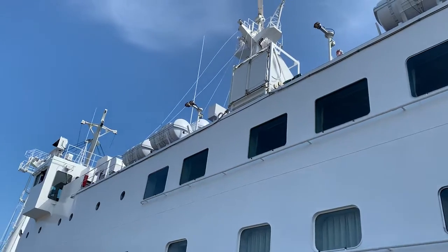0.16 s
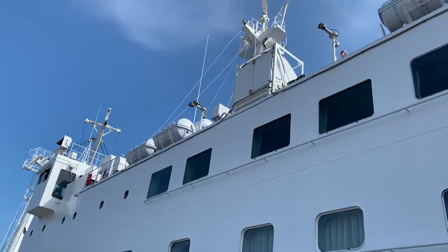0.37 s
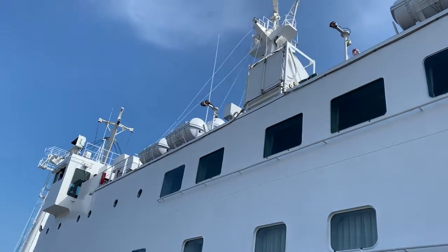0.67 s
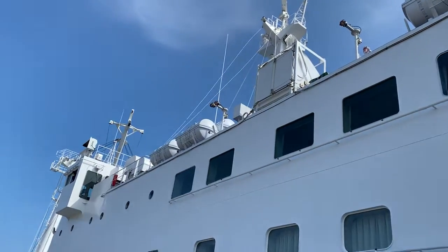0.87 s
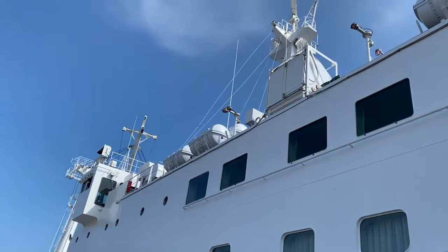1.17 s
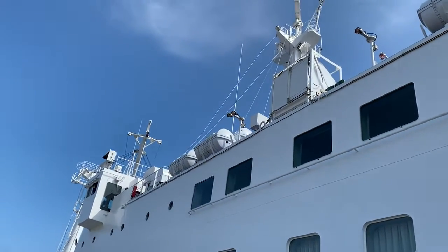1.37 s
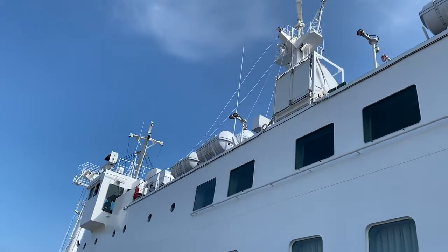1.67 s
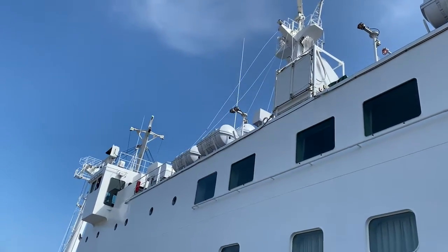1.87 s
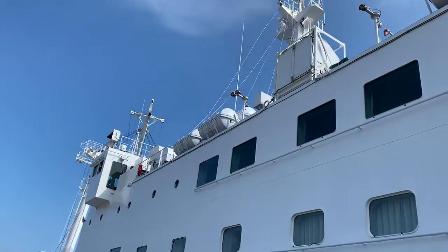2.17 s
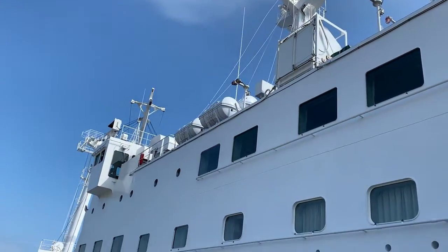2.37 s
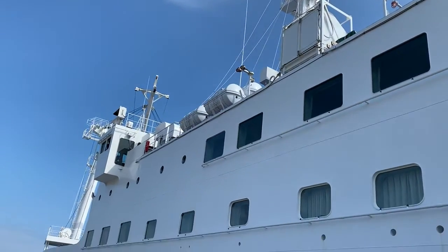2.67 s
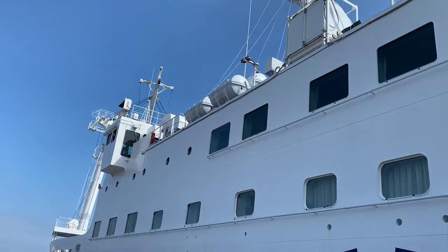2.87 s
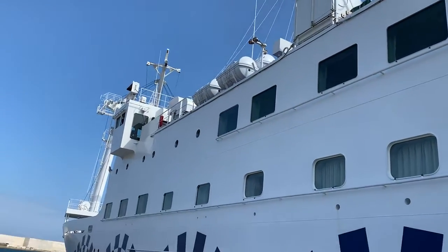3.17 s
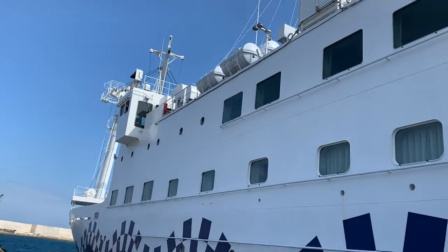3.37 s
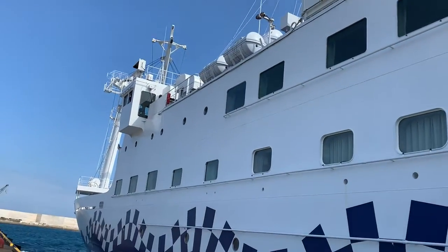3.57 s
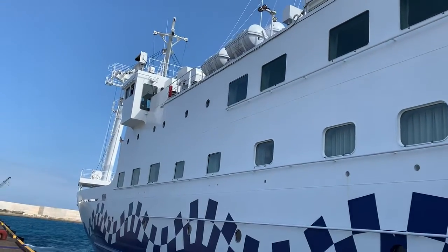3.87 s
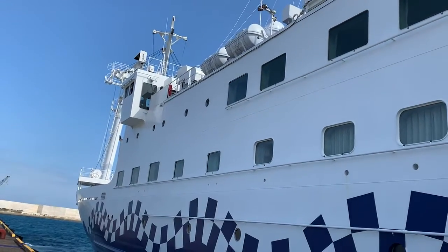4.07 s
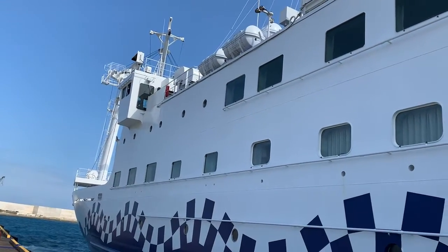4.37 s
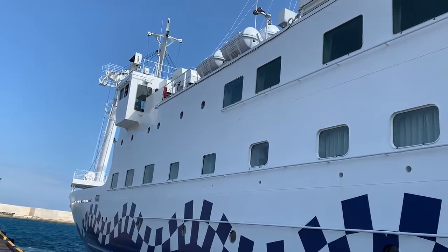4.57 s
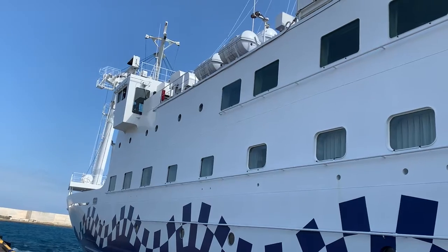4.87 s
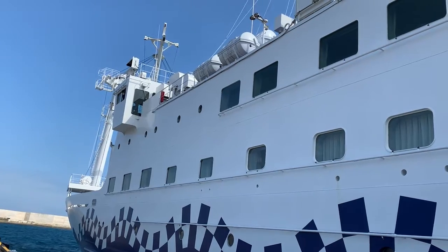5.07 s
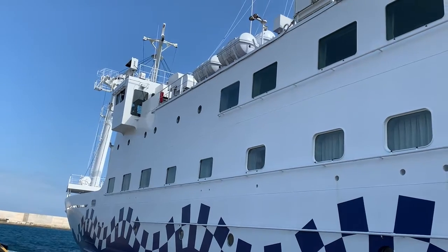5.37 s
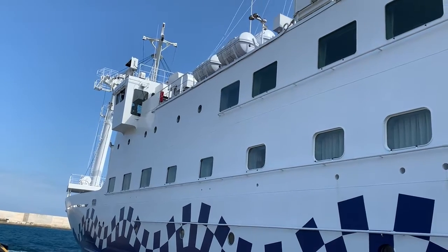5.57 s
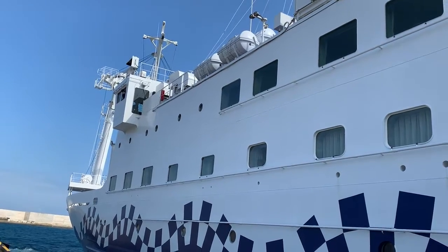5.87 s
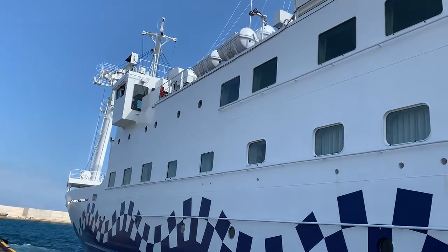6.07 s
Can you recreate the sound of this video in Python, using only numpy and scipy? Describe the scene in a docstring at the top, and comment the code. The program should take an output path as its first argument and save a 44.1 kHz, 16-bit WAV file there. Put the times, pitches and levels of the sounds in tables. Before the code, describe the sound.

From 0 s a large ferry's horn is already sounding, loud and close: one steady low note, near 180 Hz, with a strong octave and a buzzing, brassy stack of overtones that shimmer and waver. Air hisses through it, and low gusts of wind buffet the microphone underneath. The pitch never changes. At about 2.2 s the valve shuts with a tiny puff; the tone collapses within a quarter second, the lowest note lingering last, and a much weaker harbour echo fades until roughly 4.5 s. Small wind pops come at 2.4-2.9 s. From 3 to 4 s it is quiet: low rumble, faint water wash, barely audible soft rustles near 3.7 s. Wind pops return at 4.1-4.5 s, then sharp crackling, thumping bursts cluster around 4.9-5.3 s and 5.45-5.8 s, mostly left. It ends at about 6 s in rumbling wind.

```python
"""A ferry's horn at a pier holds one steady blast, which stops and echoes round the harbour.
The horn is a stack of partials; each reaches the two microphone ports by drifting paths and fades on its own.
Air hisses through the horn: noise that puffs once a cycle. Gusty wind is shaped noise that rumbles and
crackles on the ports, with pops of diving tone and crackle. Harbour wash and soft rustles are faint noise.
"""
import sys
import numpy as np
from scipy import signal
from scipy.fft import rfft, irfft, next_fast_len
from scipy.io import wavfile
from scipy.ndimage import uniform_filter1d

SR = 44100
rng = np.random.default_rng(int(sys.argv[2]) if len(sys.argv) > 2 else 0)


def store_pcm(level_fs):
    """Save levels as 16-bit WAV."""
    pcm = np.round(np.clip(level_fs, -1, 1) * 32767).astype(np.int16)
    wavfile.write(sys.argv[1], SR, np.atleast_2d(pcm).T)


N = 273640  # samples

HORN_HZ, EDGE_HZ = 179.42, 15700  # horn's fundamental, upper band limit
SHUT_S = 2.22  # the valve shuts; the near echo off the hull and quay runs on briefly
NEAR_END_S = 2.453  # the near echo has passed
HIGH_FALL = 60  # dB per s, fall of the high partials after the valve shuts
STEP = 64  # samples between values of the slow curves
BRIGHT_ROWS = [5, 8, 12, 13, 21]  # the 6th, 9th, 13th, 14th and 22nd partials
ALONE_ROWS = [0, 1, 2, 11] + BRIGHT_ROWS  # partials with a level curve of their own

# harbour echo, relative to each source's own level: [t/s, level/dB]
ECHO = [(2.2, -17.5), (2.4, -28.5), (2.6, -33.5), (2.75, -40.5), (3.0, -42), (3.4, -45.5), (3.8, -45),
        (4.2, -44), (4.8, -74)]
# the high partials together, those without a curve of their own: [t/s, level/dB]
HIGH = [(0.02, -38.5), (0.33, -33.5), (0.37, -38), (1.44, -34), (1.54, -38), (1.65, -37.5), (1.81, -35.5),
        (2.04, -34), (2.22, -39), (2.25, -34.5)]
# low rumble of the wind, which the breeze follows: [t/s, level/dB]
SWELL = [(0.0, -25.5), (0.53, -40), (0.59, -30), (0.74, -57), (0.78, -32.5), (1.28, -58), (1.38, -49),
         (1.47, -37), (2.59, -37.5), (2.64, -36.5), (4.45, -40), (4.49, -31), (4.68, -37), (4.99, -32.5),
         (5.2, -34), (5.63, -26), (5.73, -35), (6.2, -30)]


def gain_of(db):
    """Amplitude factor of a level in dB."""
    return 10 ** (np.asarray(db) / 20)


def evened(x):
    """Scales to rms 1."""
    return x / np.sqrt(np.mean(abs(x) ** 2) + 1e-20)


def read(points, hz):
    """Reads a frequency curve, straight between points on a log frequency axis."""
    f, value = np.transpose(points)
    return np.interp(np.log(hz + 1), np.log(f + 1), value)


def curves(rows, t):
    """Reads every column of a table against its first column, time."""
    s, *columns = np.transpose(rows)
    return [np.interp(t, s, c) for c in columns]


def wander(shape, rate_hz):
    """Slow complex chance of unit power, one value every STEP samples."""
    count = N // STEP + 2
    z = rng.standard_normal((*shape, count)) + 1j * rng.standard_normal((*shape, count))
    lowpass = 1 + (np.fft.fftfreq(count, STEP / SR) / rate_hz) ** 4
    return evened(np.fft.ifft(z / lowpass))


def noise(colour, same, size, patchy_db):
    """Two-port noise of rms 1 from random short-time spectra with drifting patches."""
    frames, hz = 4 * N // size + 5, np.fft.rfftfreq(size, 1 / SR)
    a, b, c, d, patches = rng.standard_normal((frames, len(hz), 5)).T
    patches = uniform_filter1d(patches, size=8, axis=0)  # across frequency
    patches = evened(uniform_filter1d(patches, size=10, axis=1))  # across time
    same = np.clip(read(same, hz), -1, 1)[:, None]
    left = a + 1j * b
    right = same * left + np.sqrt(1 - same ** 2) * (c + 1j * d)
    spectra = np.array([left, right])
    spectra *= gain_of(read(colour, hz)[:, None] + patchy_db * patches)
    return evened(signal.istft(spectra, nperseg=size, noverlap=3 * size // 4)[1][:, :N])


def held(level_db, fall, t, build_db=0.):
    """Level that builds up, holds, and gains a steady fall (dB per s) once the valve shuts."""
    build_s = 0.6
    return level_db + build_db * np.exp(-t / build_s) - fall * np.maximum(t - SHUT_S, 0)


def gusts_db(t):
    """Each gust rises and falls as a bell over the breeze."""
    # gusts that buffet the ports: [peak t/s, level/dB, width/s]
    gust_list = [(0.17, -27, 0.084), (0.43, -26.5, 0.095), (0.52, -27.5, 0.042), (0.61, -20.5, 0.056),
                 (0.75, -25, 0.049), (0.98, -27.5, 0.12), (1.15, -23.5, 0.05), (1.32, -27, 0.035),
                 (1.43, -23.5, 0.073), (1.53, -35, 0.021), (1.64, -28.5, 0.032), (1.829, -26, 0.035),
                 (2.001, -21.5, 0.025), (2.091, -29.5, 0.032), (2.2, -24, 0.083), (2.409, -23, 0.014),
                 (2.471, -27, 0.022), (2.557, -29, 0.021), (2.698, -32, 0.0072), (2.79, -40.5, 0.061),
                 (2.9, -34.5, 0.014), (3.1, -44, 0.01), (3.26, -37, 0.0052), (4.099, -30, 0.026),
                 (4.278, -28, 0.006), (4.37, -36, 0.049), (4.482, -28, 0.013), (4.528, -28.5, 0.016),
                 (4.701, -38.5, 0.02), (4.948, -29.5, 0.038), (5.05, -38, 0.032), (5.21, -32.5, 0.025),
                 (5.26, -35.5, 0.01), (5.38, -37, 0.024), (5.459, -29, 0.02), (5.521, -20.5, 0.0077),
                 (5.591, -23, 0.026), (5.663, -22.5, 0.024), (5.779, -23.5, 0.028), (5.869, -34.5, 0.022),
                 (6.1, -38, 0.035)]
    breeze_db = -13  # buffeting between gusts, below the rumble
    level = gain_of(curves(SWELL, t)[0] + breeze_db)
    for s, db, width in gust_list:
        level = level + gain_of(db) * np.exp(-.5 * ((t - s) / width) ** 2)
    return 20 * np.log10(level)


def partials_db():
    """Relative level of every partial up to the band edge."""
    # the horn's lower partials: [multiple of the fundamental, relative level/dB]
    lower = [(1, -2.5), (2, -3), (3, -13.5), (4, -24.5), (5, -22.5), (6, -27), (7, -30.5), (8, -26),
             (9, -19.5), (10, -35.5), (11, -24.5), (12, -24), (13, -30.5), (14, -27), (15, -30.5),
             (16, -32.5), (17, -31), (18, -37.5), (19, -31.5), (20, -38.5), (21, -43), (22, -47),
             (23, -31.5), (24, -41), (25, -34.5), (26, -37), (27, -48.5), (28, -38.5), (29, -39),
             (30, -48.5), (31, -40.5), (32, -50.5), (33, -43), (34, -37.5), (35, -48.5), (36, -37.5),
             (37, -45), (38, -41.5), (39, -52.5), (40, -59)]
    # the top partials: [f/Hz, relative level/dB]
    sheen = [(7300, -47.5), (8500, -45), (10500, -50.5), (11800, -44.5), (12800, -50), (14000, -55),
             (15500, -76.5)]
    hz = HORN_HZ * np.arange(len(lower) + 1, EDGE_HZ // HORN_HZ + 1)
    return np.concatenate([np.transpose(lower)[1], read(sheen, hz)])


def blast_levels(count, t):
    """Level curves of the partials: they swell and fade as their paths add or cancel."""
    # the 2nd, 3rd and 12th partials: [t/s, level/dB] each
    second_curve, third_curve, twelfth_curve = [(0.0, -32.5), (0.25, -27.5), (0.33, -34), (0.5, -21.5),
                                                (0.64, -15.5), (0.72, -20), (0.81, -15.5), (1.47, -18),
                                                (1.92, -13), (2.25, -11.5)], [(0.0, -38.5), (0.3, -36), (0.39, -41),
                                                                (0.5, -33), (0.72, -29), (1.2, -28.5),
                                                                (1.47, -35), (1.62, -67), (1.92, -38.5),
                                                                (2.1, -36), (2.25, -28)], [(0.02, -40.5), (0.3, -30),
                                                                               (0.47, -39), (0.81, -33.5),
                                                                               (1.16, -38.5), (1.44, -32),
                                                                               (1.58, -39.5), (1.91, -33),
                                                                               (2.06, -37.5), (2.17, -36.5),
                                                                               (2.25, -36)]
    # five bright partials: [t/s, 6th level/dB, 9th level/dB, 13th level/dB, 14th level/dB, 22nd level/dB]
    bright_curves = [(0.02, -46, -65, -60, -63, -46.5), (0.34, -47.5, -45, -52, -48, -44.5),
                     (0.49, -40, -42, -60, -51, -69), (0.68, -36.5, -40, -50, -51, -64),
                     (0.83, -34, -43, -41, -38.5, -47), (0.95, -36, -61, -47, -42.5, -42.5),
                     (1.09, -45.5, -42.5, -50, -37, -39), (1.67, -34, -36, -41, -37, -43),
                     (1.83, -56, -38, -42, -46, -53), (1.99, -34, -52, -48, -40, -31),
                     (2.11, -40, -38, -43, -33, -46), (2.25, -36, -36.5, -48, -52, -49)]
    low_lag_s = 0.03  # the 2nd partial rings on briefly in the bell
    # level in dB, then fall in dB per s
    first = held(-13, 87, t)
    middle = held(-27.5, 68, t, build_db=-4.5)  # partials 4-9 are still building up at the start
    high = held(curves(HIGH, t)[0], HIGH_FALL, t)
    second = held(curves(second_curve, t)[0], 230, t - low_lag_s)
    third = held(curves(third_curve, t)[0], 180, t)
    # the 1st partial's echo holds on longer and breaks up
    first = np.maximum(first, -24.5 + 5 * wander((), rate_hz=12.0).real)
    db = np.array([first, second, third] + 6 * [middle] + (count - 9) * [high])
    db[9:] += 3.5  # the two ports hear these out of step, so each port is louder than their mean
    db[11] = held(curves(twelfth_curve, t)[0], 190, t)
    db[BRIGHT_ROWS] = held(np.array(curves(bright_curves, t)), HIGH_FALL, t)
    return db


def blast_shares(db):
    """Splits the middle and high levels among their partials; the rest keep their own level whole."""
    share = gain_of(db)[:, None]
    share[ALONE_ROWS] = 0
    share[3:9] /= np.linalg.norm(share[3:9])
    share[9:] /= np.linalg.norm(share[9:])
    share[ALONE_ROWS] = 1
    return share


def blast_paths(k, t):
    """Main path plus drifting side paths to each port; short waves scatter more and drift faster."""
    count = len(k)
    # ship, air and hand move
    scatter = np.where((k == 8) | (k == 12), .35, np.clip(.02 * k ** 1.75, 0, .94))
    slow, quick = wander((2, count), rate_hz=2.36), wander((2, count), rate_hz=7.4)
    brisk = np.clip(k / 16.8, 0, .8)
    drift = np.sqrt(1 - brisk ** 2) * slow + brisk * quick
    drift[1, :9] = .75 * drift[0, :9] + .66 * drift[1, :9]  # long waves drift alike on both ports

    start = np.exp(2j * np.pi * rng.random((2, count, 1)))
    start[1, :9] = start[0, :9] * np.exp(.35j * rng.standard_normal((9, 1)))  # long waves arrive alike
    start[1, 11] = start[0, 11]  # so does the strong twelfth
    # the two lowest partials stay locked in a suction pulse
    start[:, :2] = -np.exp([[[.12j], [.25j]], [[-.12j], [-.25j]]])

    shake = np.minimum(0.078 + gain_of(gusts_db(t) + 13.5), .5)
    flutter = 1 + shake * wander((count,), rate_hz=24.0) * (k < 4)  # gusts shake the low partials
    direct = (np.sqrt(1 - scatter ** 2) * start + scatter * drift) * flutter

    # the bright partials and the twelfth carry a part in opposite phase on the two ports
    opposed = np.array([1, -1])[:, None, None]
    direct[:, BRIGHT_ROWS] = start[0, BRIGHT_ROWS] + .7 * opposed * drift[0, BRIGHT_ROWS]
    direct[:, 11] += .4 * opposed[:, 0] * drift[0, 11]
    direct[:, BRIGHT_ROWS] += .25 * quick[1, BRIGHT_ROWS]  # these waver alike too

    # from the 3rd partial up, the near echo's paths take over as the valve shuts
    handover = np.pi / 2 * np.clip((t - SHUT_S) / .02, 0, 1) * (k > 2)
    paths = np.cos(handover) * direct + np.sin(handover) * wander((2, count), rate_hz=11.3)
    # the two lowest partials drop as the reed stops
    paths[:, :2] *= gain_of(-3.5 * np.clip((t - SHUT_S - 0.03) / 0.035, 0, 1))
    return paths


def far_echo(db, k, t):
    """The harbour returns every partial, coloured and fading on its own."""
    # colour of the harbour echo: [f/Hz, level/dB]
    echo_colour = [(180, 0.5), (360, -5.5), (1000, 3.5), (1500, -7.5), (2150, -0.5), (2500, 0), (3600, -6),
                   (4500, -10), (8000, -9.5), (15000, -11)]
    echo_db = curves(ECHO, t)[0] + (db + read(echo_colour, HORN_HZ * k[:, 0]))[:, None]
    onset = np.clip((t - ECHO[0][0]) / 0.11, 0, 1)
    return gain_of(echo_db) * wander((2, len(db)), rate_hz=5.5) * onset


def stack(gains):
    """Sums the horn's partials, each with its complex gain (ports x partials x steps)."""
    at, out = np.arange(N) / STEP, np.zeros((2, N))
    turn = np.exp(2j * np.pi * HORN_HZ * np.arange(N) / SR)
    steps, partial = np.arange(gains.shape[2]), np.ones(N, complex)
    for k in range(gains.shape[1]):
        partial = partial * turn
        for port in range(2):
            out[port] += (np.interp(at, steps, gains[port, k]) * partial).real
    return np.sqrt(2) * out


def horn():
    """The reed's pulses by the main path and by drifting side paths, then the near and the far echo."""
    db = partials_db()
    k, t = np.arange(1, len(db) + 1)[:, None], np.arange(N // STEP + 2) * STEP / SR
    levels = gain_of(blast_levels(len(db), t))
    jitter = np.exp(1j * k * 0.015 * wander((), rate_hz=30.0).real)  # the reed's timing trembles
    tilt = 1. * (k == 1) - 3.0 * (k == 3) + 2.0 * (abs(k - 29) < 6)
    sides = gain_of(np.array([-1.6, 1.6])[:, None, None] * tilt)  # left and right levels of some partials
    # partials drop out unevenly, the 1st last
    ends = np.where(k == 1, 2.63, NEAR_END_S + .04 * rng.standard_normal(k.shape))
    blast = blast_paths(k, t) * jitter * sides * blast_shares(db) * levels
    blast = blast * np.clip((ends - t) / 0.091, 0, 1)
    top_fall = 4.2  # extra dB per s for each kHz: the near echo is duller
    blast = blast * gain_of(held(0, top_fall * HORN_HZ * k / 1000, t))
    return stack(blast + far_echo(db, k, t))


def air():
    """Turbulent air in the horn's throat puffs once a cycle, follows the high partials, vents and echoes."""
    # air hissing through the horn: [f/Hz, relative density/dB]
    air_colour = [(600, -40), (1200, 0.5), (2500, -6.5), (4500, -4.5), (6500, -6.5), (8500, -7.5),
                  (10500, -12.5), (11800, -36), (13000, -34), (14300, -10), (15600, -33)]
    # puff of air as the valve shuts: (t/s, level/dB, width/s)
    s, db, width = (2.261, -35, 0.011)
    t = np.arange(N) / SR
    puff = 1 + .5 * np.cos(2 * np.pi * HORN_HZ * t)
    likeness = [(600, .3), (5000, .2), (9000, .7)]  # f/Hz, left-right likeness
    hiss = noise(air_colour, likeness, size=1024, patchy_db=4.5)

    band = signal.butter(2, [1300., 3000.], "band", fs=SR, output="sos")
    vent = evened(signal.sosfilt(band, rng.standard_normal(N)))
    shut = gain_of(db) * np.exp(-.5 * ((t - s) / width) ** 2) * vent

    echo = gain_of(curves(ECHO, t)[0] - 33) * hiss * np.clip((t - SHUT_S) / 0.056, 0, 1)
    hiss_db = held(curves(HIGH, t)[0], HIGH_FALL, t) - 10  # below the high partials
    direct = gain_of(hiss_db) * puff * hiss * np.clip((NEAR_END_S - t) / 0.05, 0, 1)
    return shut + echo + direct


def wind():
    """Lumpy low rumble, buffeting whose eddies flicker, and fine crackle that thickens in the gusts."""
    # colours of the rumble and the buffeting: [f/Hz, relative density/dB] each
    rumble_colour, buffet_colour = [(12, -32), (20, -22), (32, -8), (54, 5.5), (166, -7), (220, -7),
                                    (290, -27.5), (480, -120)], [(41, -35), (70, -4.5), (262, -5), (434, -6.5),
                                                    (560, -9), (874, -25), (1500, -35), (2600, -49),
                                                    (4400, -120)]
    # how alike the wind is on the two ports: [f/Hz, left-right likeness]
    wind_same = [(40, 0.84), (90, .82), (250, 0.78), (500, 0.5), (900, 0.3), (3000, 0.2)]
    t = np.arange(N) / SR
    gust_db = gusts_db(t)
    eddies = np.interp(np.arange(N) / STEP, np.arange(N // STEP + 2), wander((), rate_hz=37.6).real)
    rumble = gain_of(curves(SWELL, t)[0]) * noise(rumble_colour, wind_same, size=4096, patchy_db=-0.2)
    flicker_db = 5.5 * np.tanh(eddies)
    body = gain_of(gust_db + flicker_db) * noise(buffet_colour, wind_same, size=1024, patchy_db=1.0)

    # ticks of random size, on average 220 a second
    sizes = gain_of(3.5 * np.minimum(rng.exponential(1, N), 3)) * (rng.random(N) < 220 / SR)
    ticks = signal.oaconvolve(sizes, np.hanning(70))[:N] * rng.standard_normal((2, N))
    band = signal.butter(4, [600., 1900.], "band", fs=SR, output="sos")
    crackle = evened(signal.sosfilt(band, ticks))
    crackle_db = gust_db - 21 + np.array([[1.8], [-1.8]])  # stronger on the left
    return rumble + body + gain_of(crackle_db) * crackle


def harbour():
    """Faint steady wash of water and machinery, as shaped noise."""
    # colour of the wash: [f/Hz, relative density/dB]
    wash_colour = [(60, -27.5), (110, -10.5), (270, -2), (400, -16.5), (650, -19), (1200, -19), (1700, -28),
                   (2500, -30.5), (3100, -36.5), (6500, -41.5), (7500, -44.5), (10400, -54.5), (12300, -51),
                   (14300, -68), (15600, -83)]
    # how alike the wash is on the two ports: [f/Hz, left-right likeness]
    wash_same = [(60, 0.39), (130, 0.85), (290, 0.98), (640, 0.18), (1410, 0.062), (3100, -0.00048),
                 (6820, -0.034), (15000, 0.33)]
    return gain_of(-42.5) * noise(wash_colour, wash_same, size=1024, patchy_db=1.8)


def pops():
    """An eddy bursts on a port: a crackle panned between the ports and a thump on both whose pitch dives."""
    # pops: [t/s, relative crackle level/dB, thump level/dB, left-right crackle difference/dB]
    bursts = [(2.395, -34, -28, 0), (2.458, -26, -18.5, 9), (2.575, -37, -40, 2), (2.692, -47, -25, 6),
              (2.817, -51, -51, 0), (2.885, -39, -31, -0.5), (4.08, -41, -37, 1), (4.098, -28, -18.5, 7.0),
              (4.264, -49, -31, 0.5), (4.309, -26, -27.5, 13), (4.369, -30.5, -37, 22),
              (4.447, -46, -29, 4.0), (4.477, -44, -29, 1), (4.518, -21, -23, 20), (4.678, -42, -45, 5),
              (4.694, -32, -29.5, 3), (4.746, -30, -33.5, 8), (4.878, -37, -28.5, 8), (4.891, -13, -20, 11),
              (4.904, -20, -21, 16), (4.936, -17, -26, 20), (4.959, -21, -23, 20), (5.008, -22, -38, 17),
              (5.027, -19, -21.5, 9), (5.192, -40, -42, -1), (5.244, -14.5, -14.5, 14),
              (5.352, -51, -33, 0.0), (5.444, -32, -37, 11), (5.455, -28, -38, 12), (5.481, -45, -28, 1),
              (5.51, -42, -19.5, 4), (5.522, -32, -38, 8), (5.537, -25, -38, 10), (5.57, -44, -26, 12),
              (5.585, -27, -26, 16), (5.598, -13, -24, 15), (5.616, -32, -44, 10), (5.629, -18, -24, 14),
              (5.66, -27, -18, 11), (5.666, -34, -27, 7), (5.697, -29, -22, 11), (5.735, -40, -28, 2),
              (5.773, -35, -33, 11), (5.782, -36, -34, -1), (5.79, -34, -40, 5), (5.796, -19, -24.5, 13),
              (5.859, -41, -30, -0.5), (6.089, -37, -21, 1), (6.12, -33, -26.5, 4)]
    thump_s, crackle_s = 0.004, 0.00075  # thump's time to its peak; crackle's peak comes at 1.5 crackle_s
    dive_turns, dive_s = 1.294, .0013  # pitch is about dive_turns / (t + dive_s), varied for each pop
    ragged = 0.25  # share of noise in the thump
    thumps, crackles, t = np.zeros((2, N + 2000)), np.zeros((2, N + 2000)), np.arange(2000) / SR
    slow, quick = t / thump_s, t / crackle_s
    dull = signal.butter(3, [200., 900.], "band", fs=SR, output="sos")
    for s, crackle_db, thump_db, pan in bursts:
        burst, (phase, pace) = rng.standard_normal((3, len(t))), rng.random(2)
        burst = 0.35 * burst[0] + 0.33 * burst[1:]  # partly shared by the two ports
        turns = phase + dive_turns * (0.795 + 0.41 * pace) * np.log(1 + t / dive_s)
        dive = np.sqrt(2) * np.sin(2 * np.pi * turns)
        thump = (1 - ragged) * dive + ragged * evened(signal.sosfilt(dull, burst))
        here = slice(round(s * SR), round(s * SR) + len(t))
        thumps[:, here] += gain_of(thump_db) * thump * slow * np.exp(1 - slow)
        side = gain_of(crackle_db + pan * np.array([[.5], [-.5]]))
        crackles[:, here] += side * 0.13 * evened(burst * np.exp(-(quick - 1.5) ** 2))
    low = signal.sosfilt(signal.butter(2, 950., fs=SR, output="sos"), crackles)
    sharp = signal.sosfilt(signal.butter(4, [650., 3400.], "band", fs=SR, output="sos"), low)
    return (thumps + gain_of(5.5) * sharp)[:, :N]  # the gain makes up what the filters take


def rustles():
    """Brief soft puffs of band-passed hiss swell and fade as bells."""
    # faint airy rustles: [t/s, level/dB, width/s, centre f/Hz]
    puffs = [(3.652, -67, .016, 8500), (3.728, -59, .01, 3500)]
    t, out = np.arange(N) / SR, np.zeros((2, N))
    for s, db, width, hz in puffs:
        band = signal.butter(2, [.7 * hz, 1.2 * hz], "band", fs=SR, output="sos")
        hiss = evened(signal.sosfilt(band, rng.standard_normal((2, N))))
        out += gain_of(db) * np.exp(-.5 * ((t - s) / width) ** 2) * hiss
    return out


def scene():
    """The horn, its air, the wind, the harbour, the pops and the rustles together at the ports."""
    return horn() + air() + wind() + harbour() + pops() + rustles()


def record(dry):
    """In the treble the right channel becomes a phase-turned copy of the left; peaks round off; band limit."""
    # likeness of the two channels by frequency, complete at the top: [f/Hz, left-right likeness]
    treble_same = [(5500, 0), (7400, .75), (8800, 1)]
    # phase of the right channel's copy against the left: [f/Hz, phase/half turns]
    treble_phase = [(6900, .8), (7600, 1), (8800, 2), (9900, 2), (11100, 3), (12100, 3), (13400, 4),
                    (14900, 4), (15700, 5)]
    margin = 1024  # samples of mirrored sound at the start; at least as many at the end
    size = next_fast_len(N + 2 * margin, real=True)
    padding = ((0, 0), (margin, size - N - margin))
    left, right = rfft(np.pad(dry, padding, "reflect", reflect_type="odd"))
    hz = np.fft.rfftfreq(size, 1 / SR)
    same = read(treble_same, hz)
    turned_copy = left * np.exp(1j * np.pi * read(treble_phase, hz))
    right = same * turned_copy + np.sqrt(1 - same ** 2) * right
    rounded = np.tanh(irfft(np.array([left, right]), size))
    edge = signal.firwin(511, EDGE_HZ, window=("kaiser", 9), fs=SR)
    return signal.oaconvolve(rounded, edge[None], "same")[:, margin:margin + N]


dry = scene()
out = record(dry)
store_pcm(out)
```